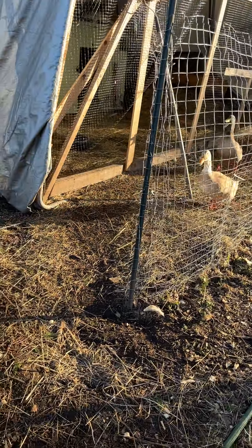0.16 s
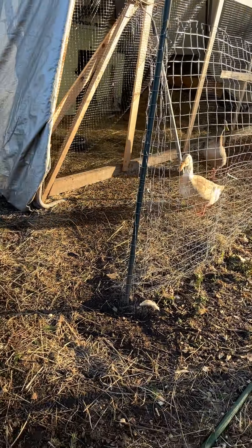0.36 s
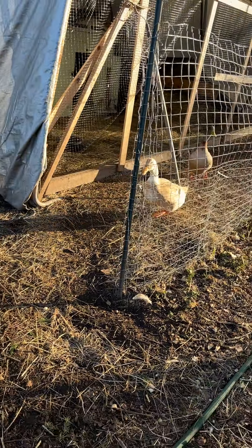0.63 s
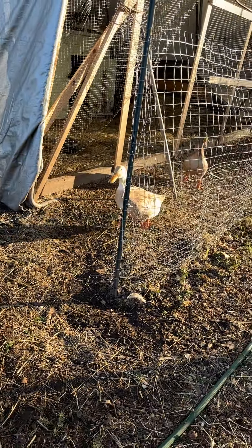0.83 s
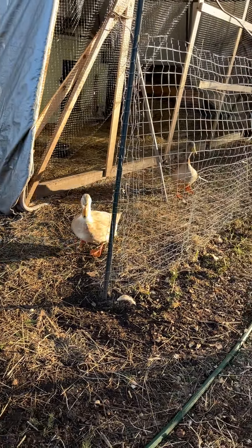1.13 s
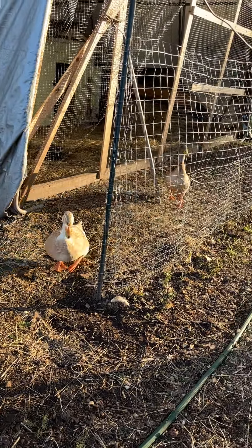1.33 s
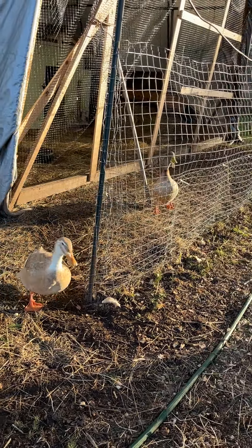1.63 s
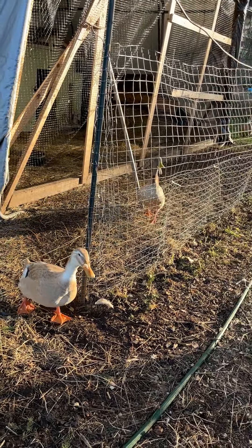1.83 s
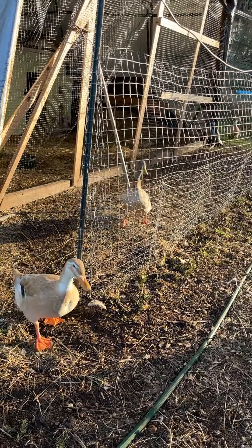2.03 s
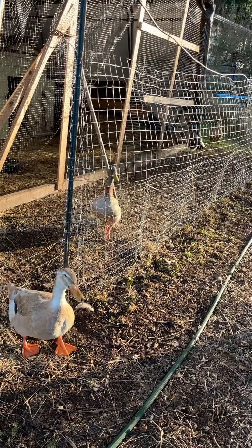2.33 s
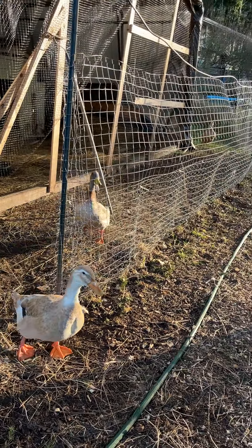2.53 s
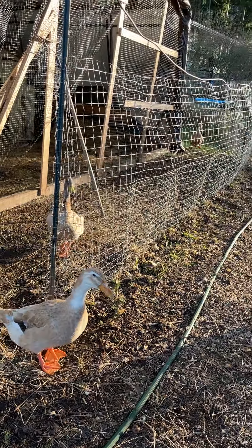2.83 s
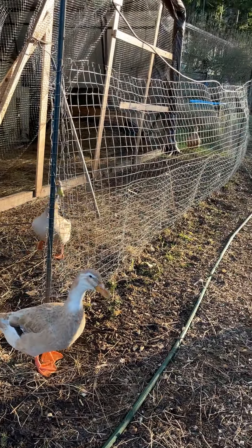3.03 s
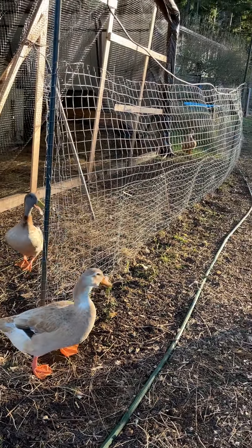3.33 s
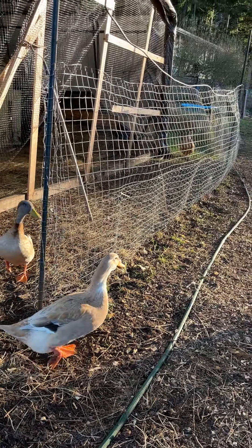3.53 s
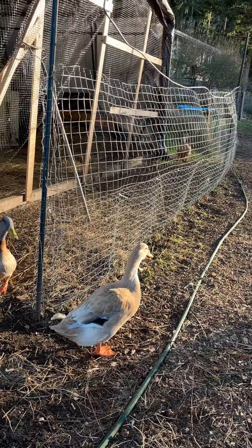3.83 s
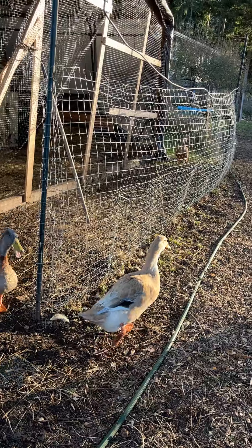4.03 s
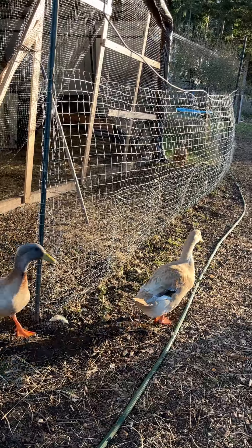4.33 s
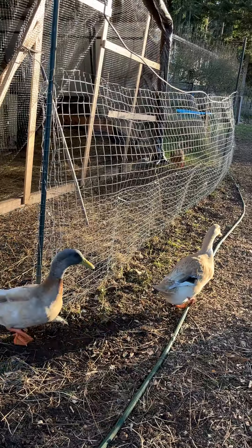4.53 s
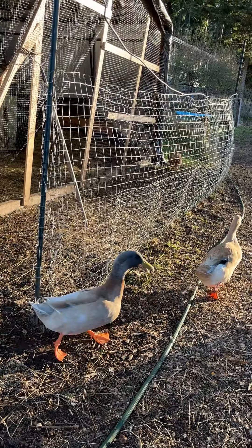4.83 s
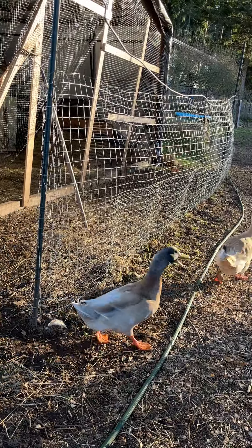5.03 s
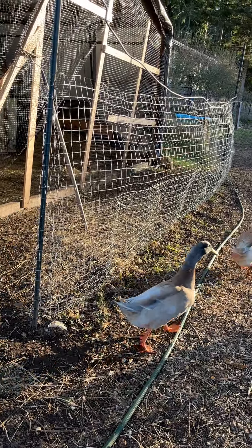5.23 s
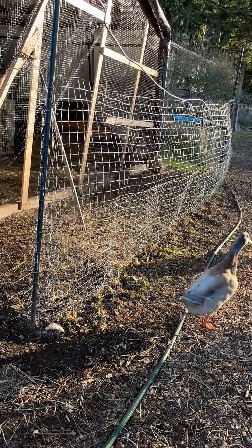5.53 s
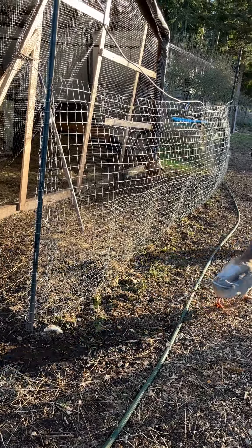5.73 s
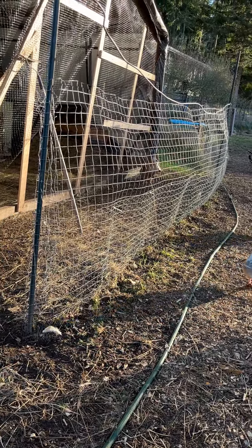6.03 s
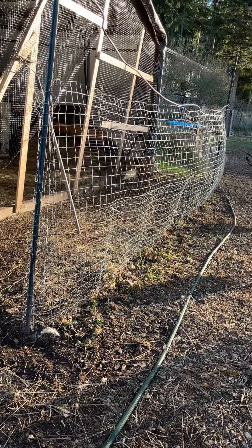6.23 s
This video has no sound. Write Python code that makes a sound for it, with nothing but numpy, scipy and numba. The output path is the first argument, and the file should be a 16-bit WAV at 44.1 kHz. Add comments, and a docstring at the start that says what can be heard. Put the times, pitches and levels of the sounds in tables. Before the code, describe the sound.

Rapid harsh duck quacks with soft clucks between them, slow hoarse drake rasps behind, then another duck's nasal quacking takes over outdoors.

```python
"""Ducks in a quiet yard

One hen gives loud double quacks and soft clucks, a second answers more nasally: pulse trains through resonances.
A drake rasps in long wheezy calls, built from fluttering chirps and noise, and peeps once as a gliding sine.
Straw ticks in bursts of noise; short echoes and a thin tail follow, over low rumble and faint hiss."""
import sys
import numpy as np
from scipy import signal
from scipy.fft import rfft, irfft, next_fast_len
from scipy.io import wavfile
from scipy.ndimage import uniform_filter1d
from numba import njit

SR = 44100
rng = np.random.default_rng(int(sys.argv[2]) if len(sys.argv) > 2 else 0)


def pcm_store(signal):
    """Save signal as 16-bit PCM."""
    levels = np.round(np.clip(np.atleast_2d(signal), -1, 1) * 32767)
    wavfile.write(sys.argv[1], SR, levels.astype(np.int16).T)


N = 281343
TIME = np.arange(N) / SR
SIZE = next_fast_len(N + SR, real=True)
FREQ = np.maximum(np.fft.rfftfreq(SIZE, 1 / SR), 1)

# first hen's vocal tract colour: freq_hz, relative_db
HEN_COLOUR = [(90,-24.5),(230,-4.5),(390,-17.5),(540,-9),(780,-6.5),(980,-11.5),(1220,-2.5),(1600,-3),(1950,-11.5),(2450,-20.5),(3600,-20.5),(4800,-29.5),(7000,-33.5),(15000,-50)]


def from_db(db):
    """Decibels to amplitude gain."""
    return 10 ** (np.asarray(db) / 20)


def rms_one(x):
    """Scale to unit power."""
    return x / np.sqrt(np.mean(x ** 2) + 1e-20)


def on_grid(points):
    """A spectrum table read on a log-frequency axis."""
    hz, value = np.transpose(points)
    return np.interp(np.log(FREQ), np.log(hz), value)


def in_time(rows):
    """The columns of a time curve, interpolated at every sample."""
    s, *columns = np.transpose(sorted(map(tuple, rows)))
    return [np.interp(TIME, s, c) for c in columns]


def filtered(x, response):
    """Apply a complex frequency response."""
    return irfft(rfft(x, SIZE) * response, SIZE)[..., :N]


def colour(x, points):
    """Causal (minimum-phase) filter with the given spectrum, by the folded cepstrum."""
    cepstrum = irfft(np.log(from_db(on_grid(points))), SIZE)
    cepstrum[1:SIZE // 2] *= 2
    cepstrum[SIZE // 2 + 1:] = 0
    return filtered(x, np.exp(rfft(cepstrum)))


def delay(seconds):
    """Response of a pure delay."""
    return np.exp(-2j * np.pi * FREQ * seconds)


def drift(rate_hz):
    """Smooth random curve of unit power: noise through a two-pole lowpass."""
    return rms_one(filtered(rng.standard_normal(N), 1 / (1 + 1j * FREQ / rate_hz) ** 2))


@njit
def resonate(x, hz, width_hz):
    """A two-pole resonance with a moving centre and about unit gain on top."""
    y = np.zeros(len(x))
    r = np.exp(-np.pi * width_hz / SR)
    for i in range(2, len(x)):
        drive = (1 - r * r) / 2 * (x[i] - x[i - 2])
        y[i] = drive + 2 * r * np.cos(2 * np.pi * hz[i] / SR) * y[i - 1] - r * r * y[i - 2]
    return y


def evened(x):
    """Hold the short-term power near 1, keeping the single pulses."""
    size = int(.014 * SR)
    power = uniform_filter1d(uniform_filter1d(x ** 2, size), size)
    return x / np.sqrt(power + 1e-12)


def treble(x, db, corner_hz=2600):
    """Raise or lower the top by a time-varying gain."""
    top = filtered(x, 1 / (1 + (corner_hz / FREQ) ** 8))
    return x + (from_db(db) - 1) * top


def current_call(rows, lead_s=.012):
    """At every sample: the time since the current call began, then that call's other columns."""
    columns = np.transpose(rows)
    index = np.maximum(np.searchsorted(columns[0] - lead_s, TIME) - 1, 0)
    start_s, *others = columns[:, index]
    return [TIME - start_s, *others]


def clicks(events):
    """One impulse an event."""
    out = np.zeros(N)
    for s, db in events:
        out[int(s * SR)] = from_db(db)
    return out


def windpipe(x, spacing_hz, reflection):
    """Sound bounces along the long windpipe, giving evenly spaced resonances."""
    return filtered(x, 1 / (1 - np.clip(reflection, -.8, .8) * delay(1 / spacing_hz)))


def background():
    """Distant rumble, alike at both ears, under faint open-air hiss."""
    # open-air hiss: freq_hz, relative_db
    air_colour = [(100,-2.5),(400,-4),(800,-1.5),(1400,-17.5),(2500,-13),(4800,-14),(8000,-17.5),(15000,-19.5)]
    rumble_colour = [(25, -35.5), (55, -6.5), (80, -2.5), (105, -5.5), (155, -2.0),
                     (200, -18.5), (300, -19), (900, -43.5), (3000, -78.5)]
    rumble = colour(rng.standard_normal(N), rumble_colour)
    air = colour(rng.standard_normal((2, N)), air_colour)
    return from_db(-52.5) * rms_one(rumble) + from_db(-65) * rms_one(air)


def rasp():
    """Level (relative dB) and whistle centre (Hz): both rise as the drake presses and sink as he lets go."""
    # drake's calls: start_s, press_s, let_go_s, top_relative_db, top_whistle_hz
    calls = [ (-0.03, 0.26, 0.12, -32, 1914), (0.760, 0.320, 0.07, -29.5, 2045),
             (1.570, 0.29, 0.0289, -27, 1806), (2.410, 0.23, 0.029, -26.5, 1805),
             (3.170, 0.28, 0.12, -27.5, 1700), (3.980, 0.200, 0.225, -26.5, 1765),
             (4.900, 0.18, 0.11, -30.5, 1725), (5.690, 0.260, 0.17, -33, 1820), ]
    attack_s, crescendo_db, fade_db = 0.032, 9.5, 21
    hold_power = 2.7  # higher holds longer, then stops faster
    start_hz, end_hz, bend_power = 1293, 1304, .55  # slack whistle at both ends; shape of the rise
    age_s, press_s, let_go_s, top_db, top_hz = current_call(calls, lead_s=0.085)
    pressed = np.clip(age_s / press_s, 0, 1)
    let_go = np.clip((age_s - press_s) / let_go_s, 0, 1.6)
    level_db = top_db + 20 * np.minimum(age_s / attack_s - 1, 0)
    level_db = level_db - crescendo_db * (1 - pressed) - fade_db * let_go ** hold_power
    rise_hz = (top_hz - start_hz) * pressed ** bend_power
    fall_hz = (top_hz - end_hz) * np.minimum(let_go, 1) ** 1.3
    return level_db, start_hz + rise_hz - fall_hz


def drake(sweep=0.69, wheeze_db=-4):
    """A slow flutter, faster as he presses; each beat lets out a rising chirp and a puff of wheeze."""
    # wheeze noise: freq_hz, relative_db
    wheeze_colour = [(120,-46),(300,-38.5),(850,-31.5),(1300,-7),(1900,0.5),(2400,-6.5),(2600,-10),(2850,-7.5),(3250,-20.5),(4200,-13),(5000,-10.5),(7000,-27.5),(15000,-46.5)]
    level_db, centre_hz = rasp()
    flutter_hz = 88 * (centre_hz / 1750) ** .45 * (1 + .045 * drift(40))
    beat = np.cumsum(flutter_hz) / SR % 1
    opening = np.sin(np.pi * beat) ** 2 * from_db(3.1 * drift(70))
    turns = centre_hz / flutter_hz * ((beat - .5) + sweep / 2 * (beat - .5) ** 2)
    chirp = rms_one(np.sin(2 * np.pi * turns + .7 * drift(110)) * opening)
    wheeze = rms_one(colour(rng.standard_normal(N) * (.2 + opening), wheeze_colour))
    x = treble(chirp + from_db(wheeze_db) * wheeze, 10 * np.log2(centre_hz / 1750))
    x = windpipe(x, spacing_hz=475.4, reflection=.38)
    return from_db(level_db - 6.5) * evened(x)


def syrinx(pitch_hz, jitter, uneven_db, alternate_db, air):
    """The membranes slap shut once a cycle, strong and weak in turn; air hisses through after each slap."""
    cycles = np.cumsum(pitch_hz * (1 + jitter * drift(120))) / SR
    at = np.flatnonzero(np.diff(np.floor(cycles)) > 0)
    steady, slaps = np.zeros(N), np.zeros(N)
    steady[at] = 1
    uneven = np.clip(rng.standard_normal(N)[:len(at)], -2, 2)
    slaps[at] = from_db(uneven_db * uneven + alternate_db * (-1) ** np.arange(len(at)))
    hiss_decay = signal.lfilter([1], [1, -np.exp(-1 / (.002 * SR))], slaps)
    hiss = rng.standard_normal(N) * hiss_decay
    # the slow flow has even strength; only the sharp edge of the slap is rough
    low = 1 / (1 + (FREQ / 340) ** 4)
    edge = rms_one(rms_one(slaps) + air * rms_one(hiss))
    return filtered(rms_one(steady), low) + filtered(edge, 1 - low)


def smeared(x):
    """Quick bounces inside the throat (two allpasses) spread each slap over a few milliseconds."""
    trips = [delay(.0009), delay(.0016)]
    return filtered(x, np.prod([(z - .45) / (1 - .45 * z) for z in trips], axis=0))


def membrane_tone(age_s, length_s, top_hz, pitch_hz,
                  tighten_s=0.013, relax_s=0.012, slack_hz=680, sag=0.22):
    """The membranes sing between slaps: a high, sagging tone while taut, a low hoot at each call's ends."""
    starting = np.exp(-(age_s / tighten_s) ** 2)
    ending = np.exp(-((age_s - length_s) / relax_s) ** 2)
    relaxed = np.minimum(starting + ending, 1)
    cycle = 2 * np.pi * np.cumsum(pitch_hz) / SR
    waver = 1 + .04 * drift(40)
    taut_hz = top_hz * (1 + sag * (.5 - np.clip(age_s / length_s, 0, 1)))
    taut = np.sin(2 * np.pi * np.cumsum(taut_hz * waver) / SR + 0.14 * np.sin(cycle))
    hoot_hz = slack_hz * (1 - 0.2 * (relaxed - .5)) * waver
    slack = np.sin(2 * np.pi * np.cumsum(hoot_hz) / SR)
    return rms_one(((1 - relaxed) * taut + 0.5 * relaxed * slack) * (1 + .5 * np.cos(cycle)))


def swell_db(age_s, length_s, attack_s, release_s, shutoff_db=50):
    """Attack, hold and release; 20 dB down at both ends, beyond which the air is shut off fast."""
    edge = np.minimum(age_s / attack_s, (length_s - age_s) / release_s)
    return np.clip(20 * (edge - 1) + shutoff_db * np.minimum(edge, 0), -100, 0)


def quack_level(age_s, length_s, first_db, waist_db, closing_db):
    """Two pushes of air joined by a waist, in dB; in short quacks the pushes merge."""
    push_s, push_attack_s, push_release_s = 0.057, .016, 0.012
    close_s, close_attack_s, close_release_s = 0.053, 0.03, 0.015
    waist_edge_s = 0.016
    first = first_db + swell_db(age_s, np.minimum(push_s, length_s), push_attack_s, push_release_s)
    waist = waist_db + swell_db(age_s, length_s, waist_edge_s, waist_edge_s)
    closing_age_s = age_s - length_s + close_s
    closing = closing_db + swell_db(closing_age_s, close_s, close_attack_s, close_release_s)
    return np.max([first, waist, closing], axis=0)


def quack_pitch(age_s, length_s, crest_hz, climb_hz_per_s, end_hz, fall_s=0.065):
    """An arch: a steady climb to the crest, then a quick fall as the air runs out."""
    past_crest_s = np.clip(age_s, 0, length_s) - length_s + fall_s
    return crest_hz + np.minimum(climb_hz_per_s * past_crest_s, (end_hz - crest_hz) * past_crest_s / fall_s)


def effort_db(level_db, slope):
    """Harder calls are brighter."""
    return slope * np.clip(level_db + 31.0, -12, 8)


def hen():
    """Loud quacks: rough slaps when she pushes hard, a purer membrane tone in the soft parts."""
    # first hen's quacks: start_s, length_s, first_push_relative_db, waist_relative_db,
    # closing_push_relative_db, crest_pitch_hz, open_bill_hz, throat_hz at 210 Hz pitch,
    # throat_db before a 6 dB lift, open_bill_treble_db
    quacks = [ (0.012, 0.059, -38, -30, -26.5, 230, 1260, 1074, 4.5, 5),
              (0.378, 0.145, -20, -24.5, -17, 278.9, 1696, 928, 6.5, 5),
              (0.584, 0.053, -39, -33.5, -28, 215, 1420, 1050, 11, 8),
              (0.718, 0.049, -40, -39.5, -39, 240, 1700, 830, 6, 13),
              (1.120, 0.14, -20, -21, -15.5, 286, 1640, 847, 6, 8.5),
              (1.328, 0.056, -29.5, -26, -32, 270.1, 1560, 860, 15, 15),
              (1.469, 0.068, -30, -37.5, -20.5, 278.5, 1585, 862, 5.5, 7),
              (1.887, 0.13, -15.5, -27, -19, 248, 1533, 790, -0.5, 4.5),
              (2.129, 0.11, -17.5, -42.5, -22, 235.7, 1510, 800, 3.5, 6),
              (2.353, 0.11, -16.5, -33.5, -22, 229.6, 1488, 792, 1.5, 4.5),
              (2.659, 0.12, -15, -28, -19, 236.4, 1373, 764, 3.5, 3),
              (2.902, 0.1, -15.5, -36.5, -20.5, 227.5, 1390, 813, -3.5, 2.5),
              (3.248, 0.132, -15, -32.5, -20, 230.9, 1420, 849.6, -4.5, 1),
              (3.485, 0.109, -15.5, -21.5, -20.5, 249.8, 1467, 808, 5, -3),
              (3.749, 0.12, -18, -29.5, -21.5, 243.1, 1463, 803, 5.5, -3),
              (4.028, 0.12, -19.5, -33, -21.5, 239.6, 1498, 825, 4, -4),
              (4.335, 0.050, -45, -42, -30, 230, 1594, 808, -5, 10),
              (4.594, 0.131, -21.5, -30.5, -25, 258, 1593, 920, 11, -5),
              (4.794, 0.056, -38, -30.5, -26, 234.3, 1493, 990, 9, -2.5),
              (4.935, 0.083, -23.5, -24, -26.5, 224.7, 1495, 955, 7, -2), ]
    # upper throat resonances: centre_hz at a 1400 Hz bill, width_hz, gain, bill_following (0-1)
    formants = [(1966,65,3.05,0.55),(3484,88,1.3,.25),(3930,99,1.4,0.4),(4486,280,1.66,0.5)]
    # the shutting bill lowers its resonance (share) and dulls the call
    bill_shut_s, bill_drop, shut_treble_db = .035, 0.091, -8.5
    (age_s, length_s, first_db, waist_db, closing_db,
     crest_hz, open_hz, throat_hz, throat_db, open_db) = current_call(quacks)
    level_db = quack_level(age_s, length_s, first_db, waist_db, closing_db)
    pitch_hz = quack_pitch(age_s, length_s, crest_hz, climb_hz_per_s=1050, end_hz=148.85)
    shut = np.exp(-np.maximum(length_s - age_s, 0) / bill_shut_s)
    bill_hz = open_hz * (1 - bill_drop * shut)
    treble_db = open_db + shut_treble_db * shut
    x = syrinx(pitch_hz, jitter=.028, uneven_db=3, alternate_db=2.8, air=.42)
    x = colour(smeared(x), HEN_COLOUR)
    for hz, width_hz, gain, follows in formants:
        x = x + gain * resonate(x, hz * (bill_hz / 1400) ** follows, float(width_hz))
    # the open bill has a pair of close resonances
    x = x + 2.0 * resonate(x, bill_hz * 1.002, 58.0) + 2.0 * resonate(x, bill_hz * 0.873, 56.0)
    # the throat resonance sinks with the pitch
    x = x + (from_db(throat_db + 6) - 1) * resonate(x, throat_hz * (pitch_hz / 210) ** .45, 59.0)
    x = evened(treble(x, treble_db + effort_db(level_db, slope=0.33)))
    tone_db = np.clip(-.7 * (level_db + 29), -10, 3)
    tone = from_db(tone_db) * membrane_tone(age_s, length_s, bill_hz, pitch_hz)
    return from_db(level_db - 4.0) * evened(x + tone)


def straw():
    """Dry stalks snap with a brief crackle: noise decaying over 2 ms."""
    # snaps: time_s, relative_db
    snaps = [(0.3232, -33), (2.345, -54.5), (3.1802, -37.5), (4.1297, -51), (5.1217, -59), (5.5058, -43)]
    decay = signal.lfilter([1], [1, -np.exp(-1 / (.002 * SR))], clicks(snaps) + 1e-18)
    crackle = rng.standard_normal(N) * decay
    return from_db(-3) * colour(crackle, [(1500, -10), (5000, 0), (15000, -7)])


def clucks():
    """Single slaps of the membranes with the bill nearly shut."""
    # slaps: time_s, relative_db
    slap_events = [(0.546, -25), (0.555, -23.5), (0.681, -26.5), (0.719, -28.5), (0.748, -24.5),
                   (0.753, -22), (1.071, -25.5), (1.297, -18), (1.306, -23), (1.432, -28), (2.093, -30),
                   (2.319, -23.5), (2.866, -32), (3.455, -24.5), (3.973, -31.5), (4.767, -28)]
    x = colour(smeared(clicks(slap_events)), HEN_COLOUR)
    upper = 1.1 * resonate(x, np.full(N, 1060.), 280.0)
    lower = 1.0 * resonate(x, np.full(N, 700.), 90.)
    return from_db(25.5) * (x + upper + lower)


def peep(fade_db_per_s=1000):
    """A near-pure whistle from the drake that arches up and down."""
    # whistle curve: time_s, relative_db, pitch_hz
    curve = [(3.127,-63,1500),(3.14,-55.5,1886),(3.16,-54,2020),(3.173,-44.5,1448),(3.191,-57.5,1248)]
    level_db, hz = in_time(curve)
    outside_s = np.abs(TIME - np.clip(TIME, curve[0][0], curve[-1][0]))
    fade_db = np.minimum(fade_db_per_s * outside_s, 100)
    return from_db(level_db - fade_db) * rms_one(np.sin(2 * np.pi * np.cumsum(hz) / SR))


def second_hen():
    """A more nasal quack with one strong resonance; the membranes sing through in the softest parts."""
    # second hen's quacks: start_s, length_s, first_push_relative_db, waist_relative_db,
    # closing_push_relative_db, crest_pitch_hz, bill_hz, throat_db, base_treble_db
    quacks = [ (4.512, 0.054, -36, -39.5, -30.5, 300.2, 1500, -6, 4),
              (4.568, 0.090, -29, -31, -28.5, 248.7, 1650, -8, 0.5),
              (4.848, 0.115, -24, -27.5, -32, 255.1, 1412, -7, 3.5),
              (5.295, 0.084, -24.5, -36, -31.5, 225.2, 1424, 13, -0.5),
              (5.372, 0.107, -23, -28, -29, 240.7, 1480, 6.5, 4.5),
              (5.502, 0.063, -26.5, -30.5, -28.5, 265.4, 1344, 17.5, 1.5),
              (5.654, 0.13, -21.5, -29, -36, 243.3, 1380, 4, 4),
              (5.824, 0.064, -33, -28.5, -28, 264.3, 1352, 12, -8),
              (5.948, 0.12, -23, -25.5, -29, 246.5, 1480, -7, 4),
              (6.153, 0.12, -27, -34.5, -22.5, 265.8, 1331, 7.5, -8),
              (6.255, 0.12, -23, -25, -38.5, 246.7, 1493, -3.5, -2.5), ]
    # vocal tract colour: freq_hz, relative_db
    tract_colour = [(90,-35.5),(230,1.5),(360,4.5),(480,-13.5),(700,-15.5),(980,-15.5),(1330,8),(1650,2.5),(2150,-7),(2500,-19.5),(3600,-15),(5000,-19),(7000,-24.5),(15000,-46)]
    (age_s, length_s, first_db, waist_db, closing_db,
     crest_hz, bill_hz, throat_db, treble_db) = current_call(quacks)
    level_db = quack_level(age_s, length_s, first_db, waist_db, closing_db)
    pitch_hz = quack_pitch(age_s, length_s, crest_hz, climb_hz_per_s=800, end_hz=182.9)
    x = syrinx(pitch_hz, jitter=.025, uneven_db=3, alternate_db=2.8, air=.4)
    x = colour(windpipe(smeared(x), spacing_hz=560, reflection=.35), tract_colour)
    x = x + 0.6 * resonate(x, bill_hz, 120.0)
    x = x + from_db(throat_db) * resonate(x, np.full(N, 900.), 200.0)
    x = evened(treble(x, treble_db + effort_db(level_db, slope=0.068)))
    tone_db = np.clip(-.7 * (level_db + 44.5), -18, 3)
    tone = from_db(tone_db) * membrane_tone(age_s, length_s, bill_hz, pitch_hz)
    return from_db(level_db - 3.0) * evened(x + tone)


def yard(x, t60_s=0.23, tail_db=-24):
    """A few early echoes and a thin diffuse tail, different at each ear."""
    # echoes from ground, fence and shed: delay_s, level_db
    echoes = [(.0028,-64),(0.011,-17),(0.028,-51)]
    # level between the ears: freq_hz, left_minus_right_db
    ear_balance = [(250,1),(600,-1.5),(950,-6.5),(1400,-4),(2000,-2),(4000,-2),(7500,0.5)]
    # phase between the ears: freq_hz, left_lead_rad
    ear_phase = [(100,0.098),(250,0.3),(500,1.13),(800,1.01),(1300,0.7),(1800,0.29),(2600,1.97),(5000,1.753)]
    direct = 1 + sum(from_db(db) * delay(s) for s, db in echoes)
    ears = np.array([[1], [-1]])
    direction = from_db(ears * on_grid(ear_balance) / 2) * np.exp(.5j * ears * on_grid(ear_phase))
    decay = from_db(-60 * np.minimum(TIME / t60_s, 5)) * np.minimum(TIME / 0.016, 1)
    tail = rng.standard_normal((2, N)) * decay
    tail_colour = [(200, -19), (700, 6.0), (1300, 6.5), (4000, 7.5), (12000, 2.0)]
    tail = colour(tail / np.sqrt(np.sum(tail ** 2) / 2), tail_colour)
    return filtered(x, direction * direct + from_db(tail_db) * rfft(tail, SIZE))


def scene():
    """All sources in the yard; the second hen stands further to the right."""
    near = hen() + clucks() + drake() + peep() + straw()
    answer = yard(second_hen()) * from_db([[-1.1], [.8]])
    return yard(near) + answer + background()


def record(dry):
    """Microphone colour, then a steep top cut."""
    # microphone response: freq_hz, gain_db
    mic_response = [(5100,2.5),(5900,-14),(7000,-2),(8600,-7),(10300,-19.5),(12000,-3),(13500,-0.5),(15000,-12.5),(16000,-20.5)]
    cutoff_hz = 15800
    return filtered(colour(dry, mic_response), 1 / (1 + (FREQ / cutoff_hz) ** 120))


dry = scene()
out = record(dry)
pcm_store(out)
```